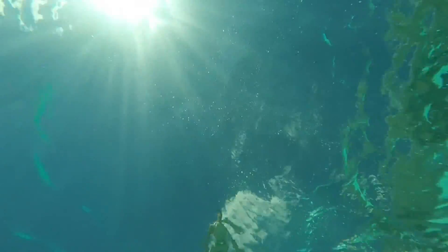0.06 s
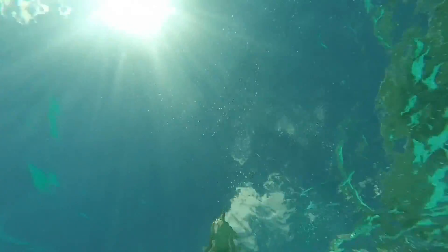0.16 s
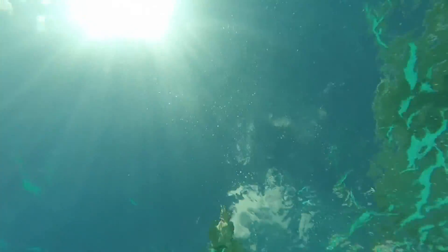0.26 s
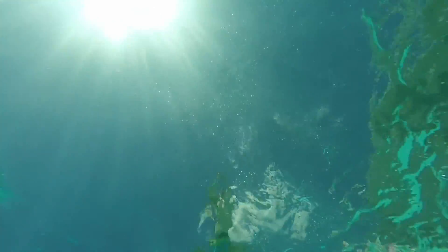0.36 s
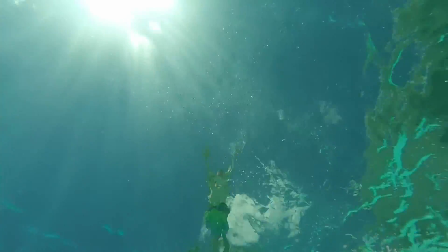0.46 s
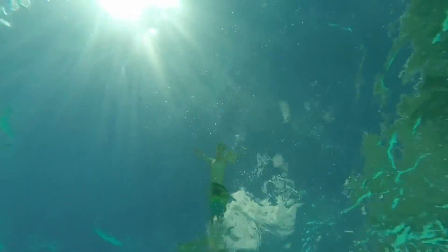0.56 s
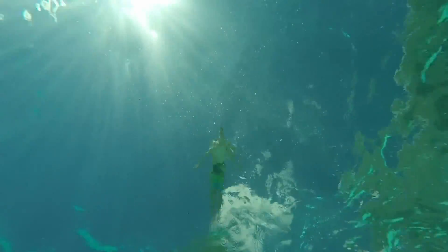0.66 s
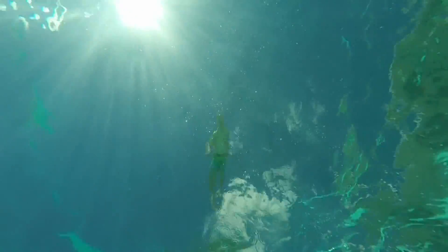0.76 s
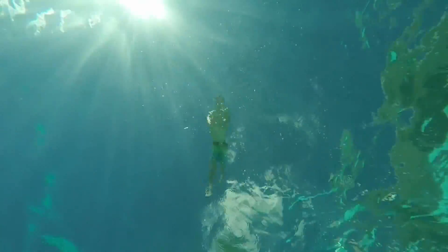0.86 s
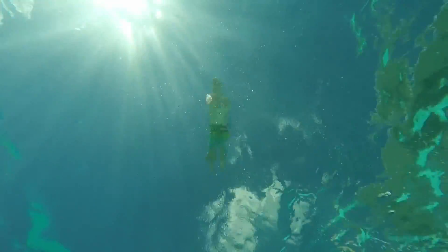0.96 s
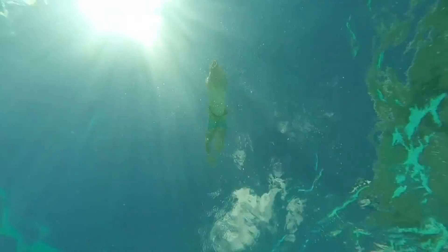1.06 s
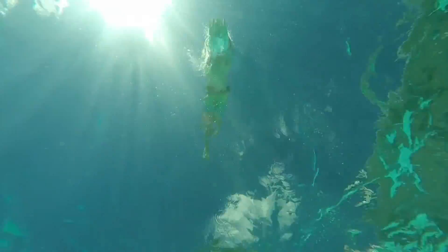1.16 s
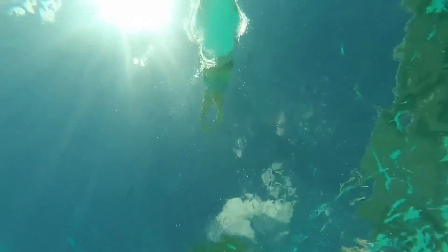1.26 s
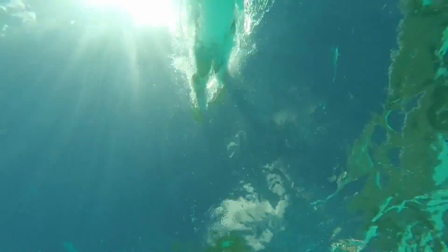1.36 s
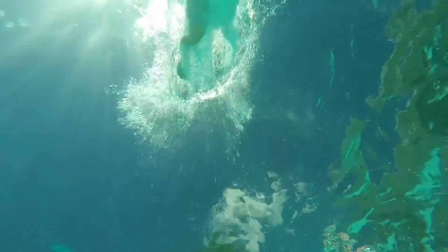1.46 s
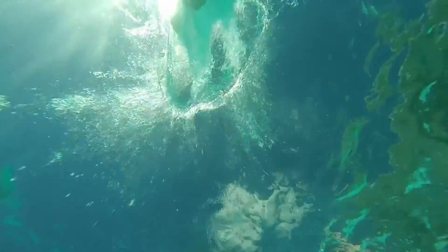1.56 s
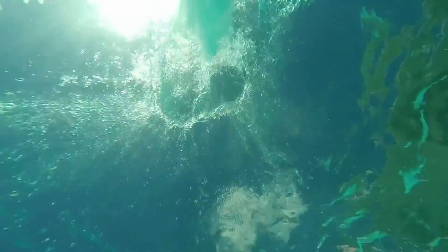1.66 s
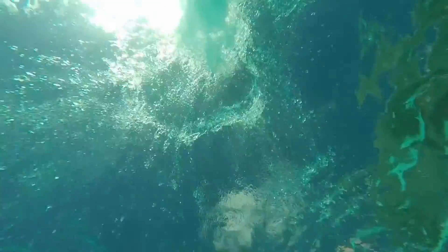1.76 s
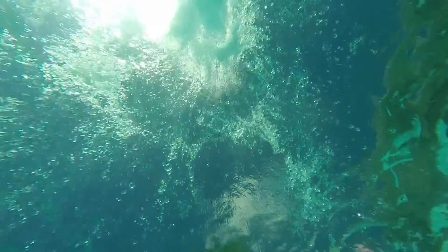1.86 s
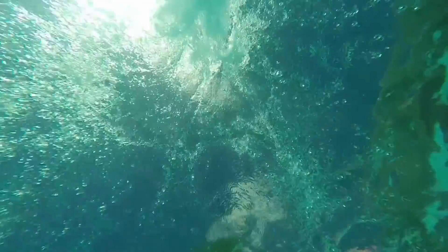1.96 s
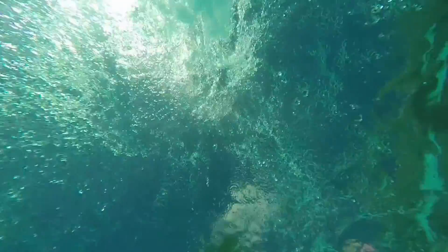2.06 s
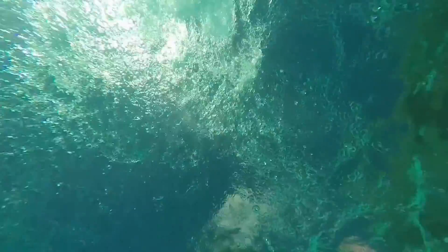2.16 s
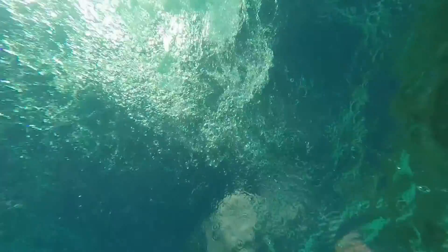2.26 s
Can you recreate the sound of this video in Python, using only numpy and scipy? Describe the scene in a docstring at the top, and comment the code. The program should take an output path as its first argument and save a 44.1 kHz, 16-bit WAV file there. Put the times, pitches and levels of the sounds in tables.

```python
"""Swimmer kicking past a submerged camera

Deep throbs are swelling sine tones; gliding sines are large bubbles and the ringing of a thump, and brief rings
are small ones that ping. Swarms of rings over noise make the ticking trickle, the short spurts and the fizzing,
gurgling surge and wake. Filtered noise gives the churning water, the clicks and a faint floor of hiss. The fizz
and clicks are coloured by the housing; a limiter and a band limit finish the sound."""
import sys
import numpy as np
from scipy import signal
from scipy.fft import rfft, irfft, next_fast_len
from scipy.io import wavfile
from scipy.ndimage import uniform_filter1d, minimum_filter1d, map_coordinates

SR = 44100
rng = np.random.default_rng(int(sys.argv[2]) if len(sys.argv) > 2 else 0)


def dump_mix(stems):
    """Bounce the given channels to the path in sys.argv[1] as a 16-bit WAV at rate SR."""
    frames = np.atleast_2d(stems).T  # one column per channel
    limited = np.clip(frames, -1, 1)  # hard clip at full scale
    pcm = np.round(limited * 32767).astype(np.int16)
    wavfile.write(sys.argv[1], SR, pcm)


N = 101430

# what the housing lets through: frequency_hz, relative_level_db
HOUSING = [(330, -40), (540, -4), (600, -15), (670, -4.5), (790, 1.5), (896, -7.5), (1060, -11),
           (1180, -2.5), (1410, 2), (1545, -13), (1660, -2), (2020, -4.5), (2230, -15.5), (2560, -6),
           (2920, -12), (3340, -5.5), (3700, -13.5), (4200, -12.5), (4850, -26.5), (5190, -18.5),
           (5700, -26), (6600, -40), (8200, -36.5), (9100, -23), (10800, -43.5), (15000, -53.5)]

BUBBLE_SWELL = 0.12  # share of its life that a small bubble takes to start
BUBBLE_RISE = 0.055  # share that its pitch climbs over its life


def amp(db):
    """Decibels to gain."""
    return 10 ** (np.asarray(db) / 20)


def unit(x):
    """Scaled to rms 1."""
    return x / np.sqrt(np.mean(x ** 2) + 1e-20)


def since(start_s):
    """Seconds since start_s, zero before it."""
    return np.maximum(np.arange(N) / SR - start_s, 0)


def ramp(u):
    """A smooth step from 0 to 1."""
    return np.sin(np.pi / 2 * np.clip(u, 0, 1)) ** 2


def decay(lives):
    """A die-away of 60 dB per life."""
    return np.exp(-np.log(1000) * lives)


def level(rows):
    """Gain per sample from (time_s, level_db) rows, fading in over 10 ms at the first."""
    time_s, level_db = np.transpose(rows)
    return amp(np.interp(np.arange(N) / SR, time_s, level_db)) * ramp(since(time_s[0]) / 0.01)


def wobble(rate):
    """A smooth random curve, rate knots a second."""
    knots = rng.standard_normal(int(N * rate / SR) + 4)
    return map_coordinates(knots, [np.arange(N) * rate / SR])


def coloured(x, points):
    """x through a causal filter with the given (frequency_hz, relative_level_db) shape, at rms 1."""
    m = 2 * next_fast_len(N)
    hz, db = np.transpose(points)
    curve_db = np.interp(np.log(np.fft.rfftfreq(m, 1 / SR) + 1), np.log(hz + 1), db)
    # folding the cepstrum gives the gain curve its minimum phase
    cepstrum = irfft(np.log(amp(curve_db) + 1e-6), m)
    cepstrum[1:m // 2] *= 2
    cepstrum[m // 2 + 1:] = 0
    response = np.exp(rfft(cepstrum))
    return unit(irfft(rfft(x, m) * response, m)[:N])


def rising_ring(hz, t, age):
    """A sine whose pitch climbs as the bubble ages from 0 to 1."""
    return np.sin(2 * np.pi * hz * t * (1 + BUBBLE_RISE * np.minimum(age, 1) / 2))


def bubbles(rate, low_hz, high_hz, cycles, spread_db, wash, size):
    """A swarm of ringing bubbles, rate a second, each rising in pitch as it dies, over a wash of noise."""
    noise = rng.standard_normal(N)
    when, pitch, big, life = rng.random((int(rate * N / SR), 4)).T[:, :, None]
    hz = low_hz + (high_hz - low_hz) * pitch
    t = np.arange(size) / SR
    age = t * hz / (cycles * (0.5 + life))
    # many weak bubbles, few strong ones
    strength = amp(-spread_db * np.log(1 - 0.97 * big)) * np.sqrt(hz)
    rings = strength * ramp(age / BUBBLE_SWELL) * decay(age) * rising_ring(hz, t, age)
    places = (when * N).astype(int) + np.arange(size)
    swarm = np.bincount(places.ravel(), rings.ravel(), N)[:N]
    return unit(swarm) + wash * noise


def echoed(x):
    """x with a short noise tail of reflections from the surface and the bottom, at rms 1."""
    echo_share, echo_t60_s = 0.3, 0.34
    t = np.arange(SR // 5) / SR
    tail = rng.standard_normal(len(t)) * decay(t / echo_t60_s)
    reflections = signal.fftconvolve(x, tail / np.linalg.norm(tail))[:N]
    return unit(x + echo_share * reflections)


def throbs():
    """Each push of water swells into a deep tone that fades and gives way to the next."""
    # pushes of water: start_s, length_s, rise_s, pitch_hz, level_db (near the end of the rise)
    pushes = [(0.0, 0.5, 0.0032, 50.4, -28.5), (0.211, 0.11, 0.0083, 43.5, -7),
              (0.465, 0.13, 0.015, 44.3, -10.5), (0.591, 0.2, 0.012, 43.47, -4),
              (.742, 0.17, 0.026, 45.07, -6), (0.917, 0.13, 0.033, 45.9, -11.5),
              (1.031, 0.15, 0.063, 44, -8.5), (1.178, 0.18, 0.052, 44.96, -7.5),
              (1.295, 0.06, 0.026, 44.1, -9.5), (1.348, 0.12, 0.039, 41.9, -8.5),
              (1.447, 0.058, 0.02, 34.5, 0), (1.611, 0.076, 0.023, 29.4, -12.5),
              (1.751, 0.25, 0.012, 39, -21)]
    fade_db_per_s, release_s = 81.5, 0.025
    out = np.zeros(N)
    for start_s, length_s, rise_s, pitch_hz, level_db in pushes:
        t = since(start_s)
        fade = amp(-fade_db_per_s * (t - rise_s))
        release = ramp((length_s - t) / release_s + 0.5)  # half way down at length_s
        shape = ramp(t / rise_s) * fade * release
        out += amp(level_db) * shape * np.sin(2 * np.pi * pitch_hz * t)
    return out


def churn():
    """Turbulent water as low, filtered noise that surges and ebbs."""
    # turbulence: time_s, level_db
    surges = [(0, -47), (.17, -51.5), (.27, -30), (.38, -39), (.45, -31.5), (.7, -45), (1.15, -44),
              (1.32, -19.5), (1.5, -33.5), (1.7, -40.5), (1.8, -35), (2.03, -25), (2.3, -26)]
    # its colour: frequency_hz, relative_level_db
    colour = [(15, 6.5), (30, 2), (70, 7.5), (130, 0.5), (225, -7.5), (350, -13), (550, -30.5), (1000, -69)]
    return level(surges) * coloured(rng.standard_normal(N), colour)


def trickle():
    """Stray bubbles trickle in the open water under a fine ticking fizz of higher rings."""
    # stray bubbles: time_s, level_db (before the trims below)
    flow = [(0, -56.5), (.14, -66), (.17, -54.5), (.42, -49), (.57, -49), (.61, -57.5), (.78, -52),
            (.9, -57.5), (.97, -64), (1.15, -61)]
    # colour of the far bubbles: frequency_hz, relative_level_db
    far_colour = [(320, -46), (590, -11.5), (720, -1), (1300, -6.5), (1560, -10), (1840, -8.5), (2640, -18),
                  (4190, -15), (5550, -31), (12200, -100)]
    # colour of the near ticks: frequency_hz, relative_level_db
    tick_colour = [(1000, -11.5), (1900, 4.5), (4400, -4), (4900, -15), (7500, -22)]
    far_trim_db, tick_trim_db = -2, -7
    far = bubbles(rate=600, low_hz=616, high_hz=3054, cycles=36, spread_db=1.5, wash=0.7, size=1500)
    near = bubbles(rate=900, low_hz=1700, high_hz=6500, cycles=24, spread_db=4.5, wash=0.4, size=1000)
    far = amp(far_trim_db) * coloured(far, far_colour)
    ticks = amp(tick_trim_db) * coloured(near, tick_colour)
    return level(flow) * (far + ticks)


def hiss():
    """A faint steady floor of filtered noise."""
    # colour of the floor: frequency_hz, relative_level_db
    colour = [(350, 15.5), (600, 6), (1400, -2.5), (4000, -0.5), (6000, -6), (15000, -10.5)]
    floor_db = -60
    return amp(floor_db) * coloured(rng.standard_normal(N), colour)


def clicks():
    """Cavities snap shut: bursts of noise start at once and die away through the housing."""
    # collapsing cavities: start_s, level_db
    cavities = [(0.076, -52.5), (0.259, -49.5), (.67, -48.5), (1.161, -33.5), (1.462, -37.5),
                (1.938, -39.5)]
    rise_s, t60_s = 0.00093, 0.09
    snaps = np.zeros(N)
    for start_s, level_db in cavities:
        t = since(start_s)
        snaps += amp(level_db) * ramp(t / rise_s) * decay(t / t60_s)
    return snaps * coloured(rng.standard_normal(N), HOUSING)


def pings():
    """The nearest small bubbles ping one by one, rising a little in pitch."""
    # close bubbles: start_s, pitch_hz, level_db (before the decay)
    near_bubbles = [(0.102, 1870, -54), (.226, 3530, -48.5), (0.287, 1860, -42.5), (.339, 4170, -45),
                    (.377, 2860, -43), (.391, 3830, -45), (.511, 4330, -46), (0.528, 1800, -40.5),
                    (.789, 2800, -44), (.864, 3300, -45.5), (.916, 1307, -44.5)]
    life_cycles, rise_s = 110, 0.0015
    out = np.zeros(N)
    for start_s, pitch_hz, level_db in near_bubbles:
        t = since(start_s)
        age = t * pitch_hz / life_cycles
        out += amp(level_db) * ramp(t / rise_s) * decay(age) * rising_ring(pitch_hz, t, age)
    return out


def spurts():
    """Short puffs of fine bubbles ahead of the surge: a dense swarm opened in brief bursts."""
    # puffs: start_s, length_s (before the release), level_db
    puffs = [(0.151, 0.024, -44), (0.775, 0.091, -53.5), (0.899, 0.014, -48.5), (1.007, 0.046, -38),
             (1.106, 0.026, -50)]
    # their colour: frequency_hz, relative_level_db
    colour = [(150, -18.5), (280, 4.5), (420, 3), (570, -8.5), (1000, -6.5), (1250, -3), (1800, -9),
              (2500, -24.5), (7000, -63)]
    rise_s, release_s = 0.016, 0.027
    shape = np.zeros(N)
    for start_s, length_s, level_db in puffs:
        release = np.exp(-since(start_s + length_s) / release_s)
        shape += amp(level_db) * ramp(since(start_s) / rise_s) * release
    swarm = bubbles(rate=4000, low_hz=235, high_hz=4830, cycles=16, spread_db=3.5, wash=0.51, size=600)
    return shape * coloured(swarm, colour)


def glugs(waver=0.03):
    """Large bubbles ring briefly with an unsteady, gliding pitch, and a thump near 0.41 s rings in several such
    tones."""
    # single large bubbles, and near 0.41 s the ringing tones and click of a thump: start_s, pitch_hz, peak_db,
    # rise_s, t60_s, glide_octaves_per_s
    glug_rows = [(0.197, 70.6, -9, .02, 0.24, -0.5), (0.278, 232, -29.5, 0.024, 0.088, -0.5),
                 (.285, 341.6, -38.5, 0.022, 0.11, -0.5), (.408, 477, -38.5, 0.0022, 0.05, -1),
                 (.409, 261.5, -18, 0.0067, 0.14, -1), (0.413, 165, -18.5, 0.0074, 0.15, 0.5),
                 (0.417, 67.3, -5.5, 0.012, 0.11, 8.5), (0.424, 352, -35.5, 0.022, 0.13, -2),
                 (0.577, 252.6, -37, 0.013, 0.29, 1), (0.624, 187.6, -31, 0.019, 0.13, 0.5),
                 (.798, 780, -39.5, 0.0035, 0.071, 0.5), (1.014, 1446, -42, .008, .1, -0.5),
                 (1.166, 344, -23.5, 0.0047, 0.078, 6.5), (1.289, 398, -18.5, .012, 0.028, -5.5),
                 (1.367, 359.7, -11.5, 0.0071, 0.082, 4.5), (1.4, 303, -19.5, 0.0066, 0.088, -12),
                 (1.636, 345, -27, 0.015, 0.075, 1.5), (1.945, 255.8, -22, 0.028, 0.22, -8.5),
                 (1.955, 308.4, -27, 0.022, 0.19, 4), (1.964, 64.5, -18.5, 0.03, 0.13, -11),
                 (1.988, 181.2, -16.5, 0.039, 0.45, -11.5), (2.2, 132.4, -22, 0.029, 0.19, 7.5)]
    out = np.zeros(N)
    for start_s, pitch_hz, peak_db, rise_s, t60_s, glide in glug_rows:
        t = since(start_s)
        pitch = pitch_hz * 2 ** (glide * np.minimum(t, t60_s)) * (1 + waver * wobble(70))
        shape = ramp(t / rise_s) * decay(np.maximum(t - rise_s, 0) / t60_s)
        phase = 2 * np.pi * np.cumsum(pitch * (t > 0)) / SR
        out += amp(peak_db) * shape * np.sin(phase)
    return out


def cloud():
    """The bubble cloud: a swarm fizzes through the housing and the finest bubbles sizzle, both echoed."""
    # bubble cloud: time_s, level_db
    fizz_levels = [(1.08, -81.5), (1.15, -53), (1.17, -39), (1.21, -37), (1.31, -29.5), (1.46, -29.5),
                   (1.5, -35.5), (1.58, -40), (1.73, -43.5), (2.12, -43.5), (2.3, -38)]
    # finest bubbles: time_s, level_db (before the trim below)
    sizzle_levels = [(1.16, -75), (1.31, -53.5), (1.5, -50.5), (1.62, -79)]
    # colour of the finest bubbles: frequency_hz, relative_level_db
    sizzle_colour = [(4500, -30), (7000, -3)]
    sizzle_trim_db = -6
    swarm = bubbles(rate=2200, low_hz=569, high_hz=6450, cycles=13.4, spread_db=1.5, wash=0.95, size=700)
    fizz = level(fizz_levels) * echoed(coloured(swarm, HOUSING))
    finest = bubbles(rate=2500, low_hz=5500, high_hz=14700, cycles=40, spread_db=2.5, wash=0.9, size=450)
    sizzle = level(sizzle_levels) * echoed(coloured(finest, sizzle_colour))
    return fizz + amp(sizzle_trim_db) * sizzle


def gurgle():
    """Large bubbles gurgle in the surge and its wake as a swarm of low, overlapping rings."""
    # large bubbles: time_s, level_db (before the trim below)
    gurgle_levels = [(1.12, -51), (1.17, -36), (1.22, -34), (1.3, -24), (1.38, -20), (1.46, -25),
                     (1.56, -33.5), (1.72, -37), (1.93, -38.5), (2.05, -32), (2.3, -32)]
    # their colour: frequency_hz, relative_level_db
    colour = [(76, -28), (130, -10.5), (189, -5), (318, 3.5), (387, -5.5), (436, -11.5), (510, -16),
              (590, -37), (810, -60), (1360, -120)]
    trim_db = 0.5
    swarm = bubbles(rate=700, low_hz=132, high_hz=613.4, cycles=13.8, spread_db=1.43, wash=0.57, size=4000)
    return amp(trim_db) * level(gurgle_levels) * coloured(swarm, colour)


def scene():
    """All the water sounds over a faint steady hiss, as one channel."""
    water = throbs() + churn() + trickle() + hiss()
    details = clicks() + pings() + spurts() + glugs()
    surge = cloud() + gurgle()
    return (water + details + surge)[None]


def record(dry):
    """The camera's limiter holds down the peaks; nothing is kept above its band limit."""
    ceiling, hold_s, top_hz = 0.93, 0.023, 15300
    hold = int(hold_s * SR)
    needed_gain = np.minimum(1, ceiling / (np.abs(dry) + 1e-9))
    gain = uniform_filter1d(minimum_filter1d(needed_gain, hold), hold)
    m = 2 * next_fast_len(N)
    passband = np.fft.rfftfreq(m, 1 / SR) < top_hz
    return irfft(rfft(dry * gain, m) * passband, m)[..., :N]


dry = scene()
out = record(dry)
dump_mix(out)
```